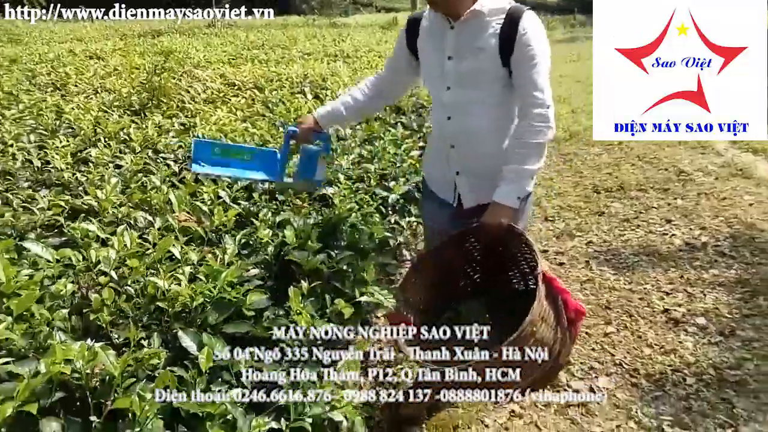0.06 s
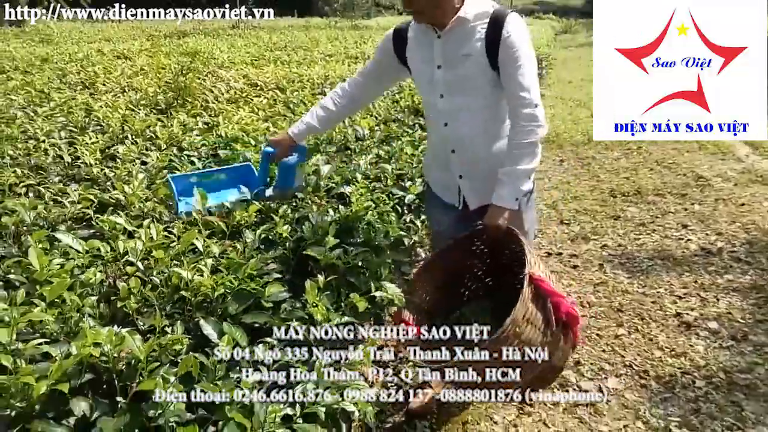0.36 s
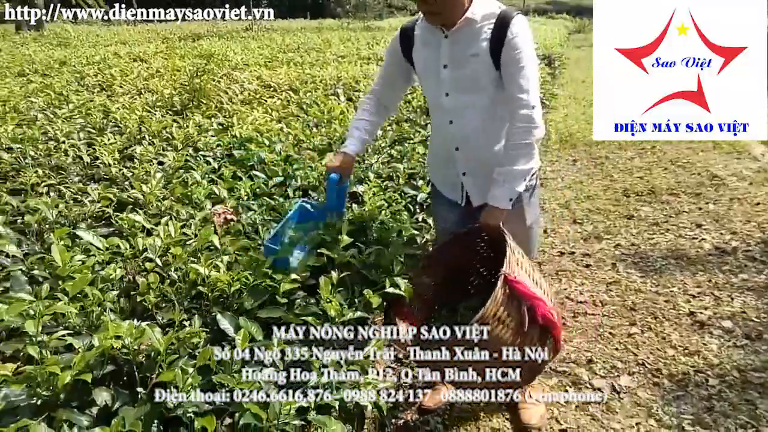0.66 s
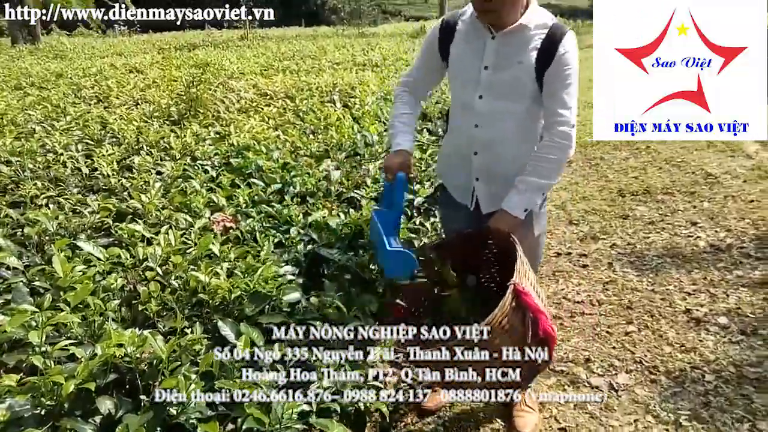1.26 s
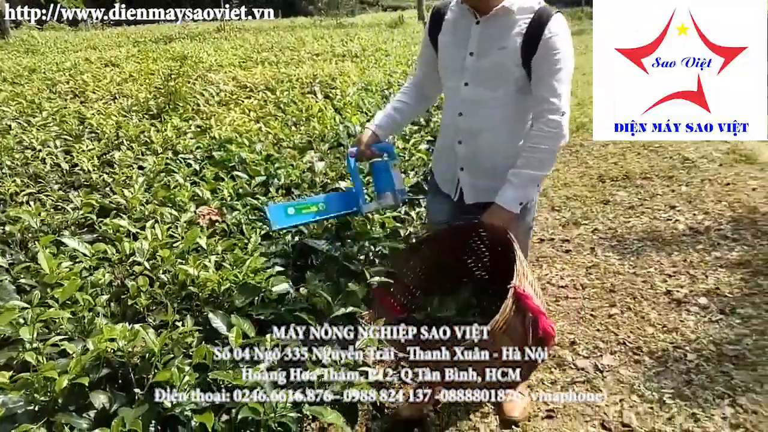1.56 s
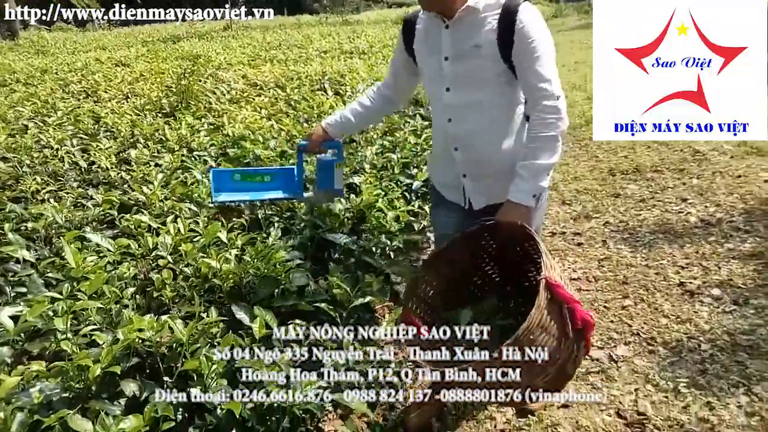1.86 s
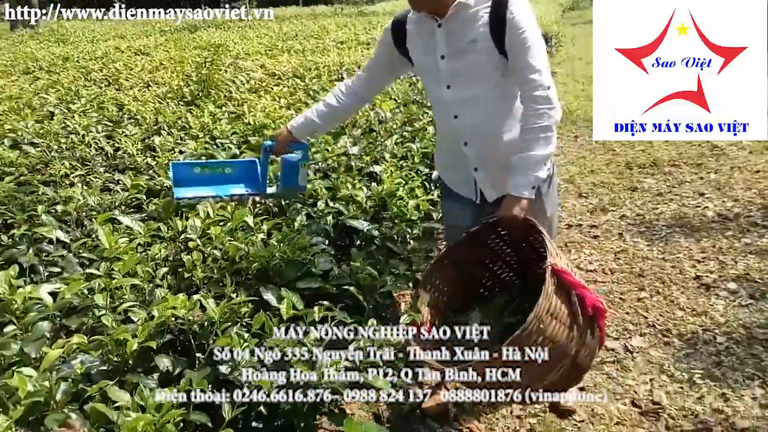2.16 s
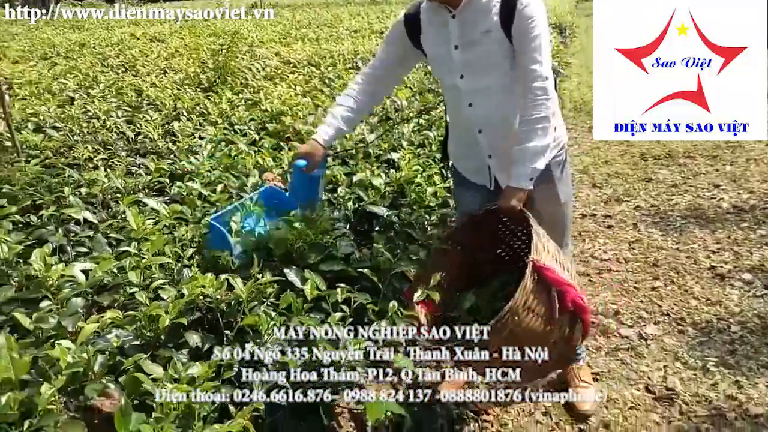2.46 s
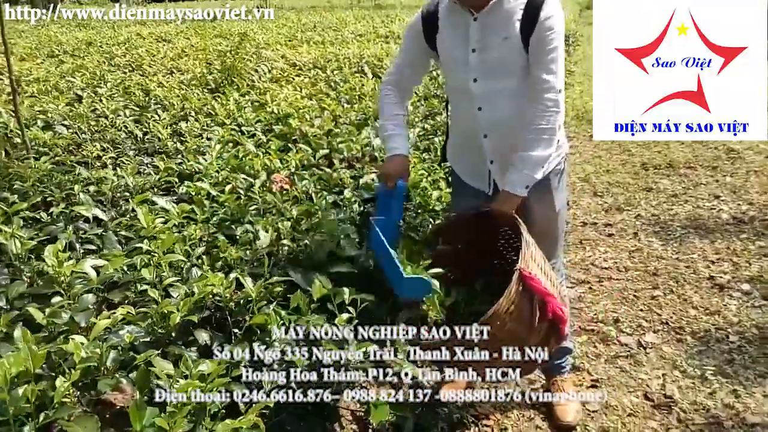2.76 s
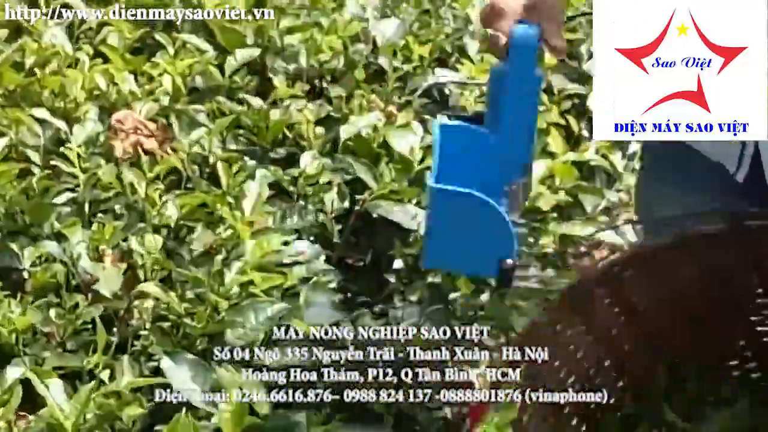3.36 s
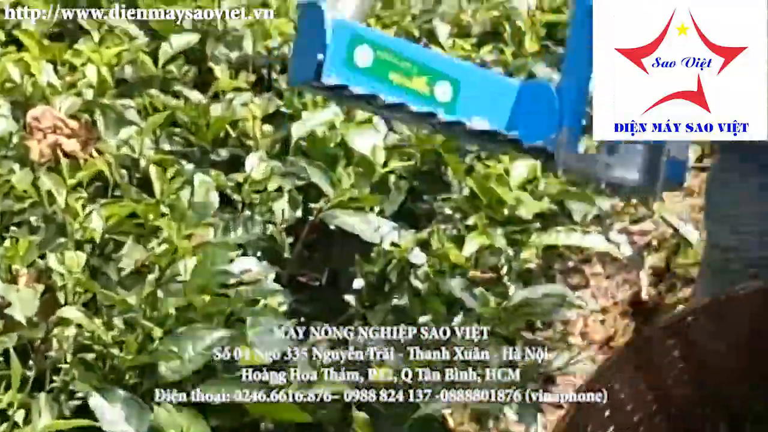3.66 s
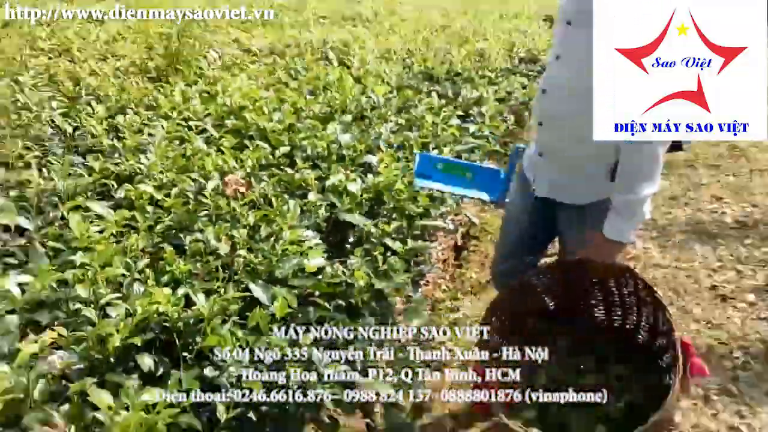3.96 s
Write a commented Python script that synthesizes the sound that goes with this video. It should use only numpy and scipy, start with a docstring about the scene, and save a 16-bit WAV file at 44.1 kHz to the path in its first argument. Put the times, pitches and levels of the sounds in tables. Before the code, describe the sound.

A battery tea cutter buzzes and rattles close by outdoors, crunching through shoots twice. It switches off and runs down with a few knocks, leaving faint rustling leaves and wind bumping the microphone.

```python
"""A battery tea cutter, close to a stereo microphone outdoors, is swept twice over a bush and tipped into
a basket. Its blades shuttle about 44 times a second: the housing hums on multiples of that rate, the
gears whine, loose blades and gears rattle in the plastic tray and shoots crunch as they are cut.
Switched off, it runs down with a few last knocks; leaves rustle and wind bumps the microphone."""
import sys
import numpy as np
from scipy import signal
from scipy.fft import rfft, irfft
from scipy.io import wavfile
from scipy.ndimage import map_coordinates

SR = 44100
rng = np.random.default_rng(int(sys.argv[2]) if len(sys.argv) > 2 else 0)


def to_wav(s):
    """Save 16-bit WAV."""
    ch = np.atleast_2d(s).T  # columns
    pcm = np.round(np.clip(ch, -1, 1) * 32767)  # PCM
    wavfile.write(sys.argv[1], SR, pcm.astype(np.int16))


N = 176400
T = np.arange(N) / SR
HZ = np.maximum(np.arange(N + 1) * SR / (2 * N), 1)
OFF_S, RUN_DOWN_S = 3.37, 0.24

# sharp resonances of the tray: (frequency [Hz], width [Hz], lift [dB])
TRAY_MODES = [(633, 138, 8.5), (831, 100, 3), (1088, 76, 6), (1378, 41, -0.5), (1620, 150, 3.5),
              (1960, 78, 3), (2140, 110, 6), (3270, 120, 4), (6600, 280, 3), (10000, 220, 4.5)]


def cutter(rattle_db=-20.5, stop_fade_s=0.09):
    """Rattle and knocks ring the tray over hum and whine; switched off, the blades coast to rest."""
    # blade speed under power: (time [s], stroke rate [Hz])
    speed = [(0.0, 44.7), (0.41, 44.5), (0.51, 44.7), (0.8, 43.6), (0.9, 42.7), (1.0, 44.1), (1.15, 44.5),
             (1.3, 43.6), (1.48, 44.4), (1.94, 44.6), (2.01, 44.3), (2.45, 44.8), (2.6, 43.4), (2.83, 44.3),
             (3.13, 44.1), (3.24, 44.3), (3.32, 44.0), (3.4, 44.7)]
    coast = np.sqrt(np.clip(1 - (T - OFF_S) / RUN_DOWN_S, 0, 1))
    strokes = 0.52 + np.cumsum(in_time(speed)[0] * coast) / SR
    moving = np.clip((OFF_S + RUN_DOWN_S - T) / stop_fade_s, 0, 1)
    contacts = np.array([rattle(strokes), rattle(strokes)])
    force = from_db(rattle_db) * moving * snap_and_tilt(contacts, strokes) + knocks()
    direct, scattered = tray(force) + np.array([bites(), bites()])
    direct = direct + bushes(direct) + reflections(direct)
    tones = hum(strokes) * coast ** 4 + whine(strokes) * coast ** 2
    return at_microphone(direct + tones, scattered + bushes(scattered))


def rattle(strokes, count=48, jitter_s=0.00014, spread_db=4):
    """The same contacts recur in every stroke, slightly early or late, amid random scraping."""
    place = (np.arange(count) + rng.random(count)) / count
    sign = rng.choice([-1, 1], count)
    chance = rng.standard_normal((200, count, 2))
    due = np.arange(len(chance))[:, None] + place
    hit_s = np.interp(due, strokes, T) + jitter_s * chance[..., 0]
    size = sign * from_db(spread_db * chance[..., 1]) * (due < strokes[-1])
    clicks = np.bincount(np.clip(hit_s * SR, 0, N - 1).astype(int).ravel(), size.ravel(), N)
    scrape = from_db(2.5) * grains(per_s=7000, spread_db=3)
    angle = 2 * np.pi * strokes
    swell = from_db(0.83 * np.cos(angle) + 0.2 * np.cos(2 * angle))
    return rms_one(swell * (rms_one(clicks) + scrape))


def snap_and_tilt(contacts, strokes, swing_db=4.5, decay_strokes=0.28, slowing_db_per_s=28):
    """The rattle snaps at each reversal and fades on slowing, most in the treble; tilting shades it."""
    # centres of the rattle's bands: (frequency [Hz])
    band_hz = [380, 720, 1200, 1900, 3500, 9000]
    # rise and fall of the bands as the tray turns: (time [s], relative level of each band [dB])
    band_levels = [(0.03, -43.5, -26.5, -23, -20.5, -16, -21), (0.22, -40.5, -22.5, -21.5, -21, -17.5, -26),
                   (0.41, -40.5, -23.5, -22, -20.5, -17, -25), (0.6, -42, -21.5, -25, -19, -17, -27.5),
                   (0.79, -51.5, -21.5, -26, -18.5, -19, -25.5), (0.98, -41, -20.5, -24, -18.5, -19, -25.5),
                   (1.17, -42, -20, -24.5, -19, -16.5, -23.5), (1.36, -41.5, -20.5, -25, -19, -17.5, -24),
                   (1.55, -41, -21.5, -26.5, -16.5, -17.5, -22.5),
                   (1.74, -40.5, -21.5, -23, -18.5, -16, -22), (1.93, -42.5, -21, -23, -21, -16, -20.5),
                   (2.12, -39.5, -26, -22, -21.5, -17, -26.5), (2.31, -45, -22.5, -24, -19, -18.5, -23.5),
                   (2.5, -40, -25, -22.5, -20.5, -20, -27.5), (2.69, -47.5, -20, -25, -16.5, -20.5, -25.5),
                   (2.88, -46, -24, -22, -19.5, -20, -24), (3.07, -40, -25.5, -24.5, -19, -20.5, -24),
                   (3.26, -35, -24, -22, -19, -17.5, -21.5), (3.38, -39.5, -28, -26, -21.5, -22, -25.5),
                   (3.47, -45, -55, -32, -23.5, -27.5, -36), (3.56, -42, -55, -28, -25, -20.5, -24)]
    strength = 1 + 0.9 * rng.uniform(-1, 1, int(strokes[-1]) + 1)
    forth, back = (np.exp(-((strokes + lead) % 1) / decay_strokes) for lead in (0, .5))
    snap_db = swing_db * strength[strokes.astype(int)] * (forth + 0.71 * back)
    slowing_db = slowing_db_per_s * np.maximum(T - OFF_S, 0)
    out = 0
    for k, level_db in enumerate(in_time(band_levels)):
        band = np.interp(np.log(HZ), np.log(band_hz), np.arange(len(band_hz)) == k)
        db = level_db + (snap_db - slowing_db) * np.sqrt(band_hz[k] / band_hz[-1])
        out = out + filtered(contacts, band) * from_db(db - db[T < OFF_S].mean())
    return out


def knocks(dull_hz=6400, ring_db=-21, ring_t60_s=0.087, ring_top_hz=2220):
    """The slowing blades strike dull blows that leave the tray ringing."""
    # last knocks: (time [s], level [dB], decay [s])
    hits = [(3.396, -17, 0.0047), (3.421, -18, 0.013), (3.4457, -18, 0.0049), (3.4766, -25, 0.011),
            (3.496, -16.5, 0.0038), (3.515, -23.5, 0.0068), (3.5405, -30.5, 0.02), (3.583, -18, 0.0085)]
    blows = filtered(bursts(hits) * rng.standard_normal((2, N)), 1 / (1 + 1j * HZ / dull_hz))
    ring = sum(np.sin(2 * np.pi * hz * T) / (1 + (hz / ring_top_hz) ** 2) for hz, _, _ in TRAY_MODES)
    ring *= from_db(-60 * T / ring_t60_s)
    return blows + from_db(ring_db) * filtered(blows, rfft(ring / np.linalg.norm(ring), 2 * N))


def tray(force):
    """The plastic tray colours every blow; some resonances stand out for a while as it turns."""
    # broad response of the tray: (frequency [Hz], relative level [dB])
    colour = [(100, -36.5), (220, -24), (330, -17), (520, -14), (590, -7.5), (740, -7), (880, -3.5),
              (970, -7), (1180, -4.5), (1400, -2), (1650, -1), (1850, -2.5), (2150, -4.5), (2450, -3),
              (2850, -10), (3200, -10), (3650, -4), (4500, -10), (5100, -18.5), (5900, -23), (6800, -20),
              (7600, -21.5), (8600, -20), (10000, -24), (11500, -26), (13300, -25), (14400, -26.5),
              (15500, -27)]
    # passing resonances: (time [s], half length [s], frequency [Hz], width [Hz], lift [dB])
    swells = [(.35, 0.48, 810, 59, 8.5), (1.155, .16, 420, 90, 6), (1.15, 0.16, 1620, 119, 2.5),
              (1.25, .3, 2980, 300, 4.5), (1.715, 0.054, 630, 110, 5.5), (1.72, 0.074, 880, 60, 5),
              (2.1, 0.39, 1414, 69.6, 5.5), (2.9, 0.11, 890, 60, 6), (3.1, 0.23, 608, 90, 8),
              (3.1, 0.77, 5860, 1400, 4), (3.296, 0.22, 1700, 120, 6)]
    modes_db = sum(lift / (1 + (2 * (HZ - hz) / width) ** 2) for hz, width, lift in TRAY_MODES)
    rung = filtered(force, causal(over_hz(colour) + modes_db))
    return rung + sum((from_db(db) - 1) * np.exp(-((T - s) / half_s) ** 2) * resonance(rung, hz, width)
                      for s, half_s, hz, width, db in swells)


def hum(strokes, gain_db=-2.5, waver_db=1.74, waver_rad=0.45):
    """The housing hums in nearly steady partials on multiples of the stroke rate."""
    # partials: (multiple of the stroke rate, relative level [dB])
    harmonics = [(6, -51.5), (7, -54), (9, -56), (11, -53), (12, -47.5), (13, -37.5), (14, -44), (15, -41),
                 (16, -49), (18, -37), (19, -34), (20, -39), (32, -41.5)]
    # the hum sinks while the blades are in the bush: (time [s], gain [dB])
    dips = [(0, 3.5), (.55, 0), (.66, 2), (.85, -8), (1.0, -2), (1.3, -6.5), (1.7, 2), (2.1, -0.5),
            (2.5, 3), (2.68, -7), (2.88, 2), (3.3, -6)]
    partials = 0
    for k, db in harmonics:
        level = from_db(db + waver_db * drift(3.2))
        partials += level * np.sin(2 * np.pi * (k * strokes + rng.random()) + waver_rad * drift(4.6))
    return np.sqrt(2) * from_db(gain_db + in_time(dips)[0]) * partials


def whine(strokes, level_db=-31.5, flare_db=5.5, flare_hz=4.1, waver_rad=0.86):
    """The gears whine in high partials that flare up at random, waver and sag with the speed."""
    # gear partials: (multiple of the stroke rate)
    multiples = (31, 32, 33, 36, 37, 38, 42, 43, 48, 49, 50)
    partials = 0
    for k in multiples:
        flare = from_db(flare_db * np.minimum(drift(flare_hz), 1))
        phase = 2 * np.pi * (k * strokes + rng.random()) + waver_rad * drift(flare_hz)
        partials += flare * np.sin(phase)
    return from_db(level_db) * rms_one(partials)


def bites(attack_s=0.033, release_s=0.12, width_hz=660):
    """Shoots are cut in a dense crunch whose pitch slides as the tray ploughs through the bush."""
    # passes over the bush: (time [s], length [s], level [dB], start pitch [Hz], end pitch [Hz])
    passes = [(0.609, .42, -29, 2200, 1811), (2.582, .45, -28.5, 1712, 2092)]
    smooth = signal.butter(2, width_hz / 2, fs=SR, output="sos")
    out = 0
    for s, length_s, db, start_hz, end_hz in passes:
        end_s = s + length_s
        envelope = np.interp(T, [s, s + attack_s, end_s, end_s + release_s], [0, 1, 1, 0])
        angle = 2 * np.pi * np.cumsum(np.interp(T, [s, end_s], [start_hz, end_hz])) / SR
        crunch = sum(signal.sosfilt(smooth, grains(per_s=1500, spread_db=4.5)) * wave(angle)
                     for wave in (np.sin, np.cos))
        out = out + from_db(db) * envelope * rms_one(crunch)
    return out


def sweep_lag_ms():
    """The sweep shifts when the sound reaches the left channel."""
    # path past the microphone: (time [s], left lag [ms])
    sweep = [(0, 0.082), (.3, 0.14), (.65, 0.14), (.95, 0.036), (1.25, -0.035), (1.6, 0.078), (2.0, 0.09),
             (2.35, 0.124), (2.6, 0.13), (3.0, -0.021), (3.6, -0.028)]
    return in_time(sweep)[0]


def at_microphone(direct, scattered):
    """The cutter is mostly louder on the left, and wider in the treble."""
    # likeness of the two channels: (frequency [Hz], correlation [0-1])
    likeness = [(200, 1), (700, 0.94), (1400, 0.82), (2200, 0.55), (4000, 0.42), (8000, 0.25),
                (15000, 0.087)]
    # balance: (frequency [Hz], left minus right [dB])
    balance = [(100, 5.5), (600, 7), (1500, 8.5), (2200, 9), (2600, 13), (3500, 6), (4600, 10.5),
               (5900, -0.5), (6900, -1), (8200, -14.5), (9500, -2), (12000, -2), (15000, 10)]
    left, right = stereo(direct, scattered, over_hz(likeness), over_hz(balance))
    return np.array([delayed(left, sweep_lag_ms()), right])


def reflections(x):
    """Ground, body and basket return near echoes that move with the sweep."""
    # echoes: (delay [ms], extra delay per left lag [ms/ms], gain [dB])
    echoes = [(1.2, 3.3, -40), (2.5, 4.43, -16.5), (4.7, 5.09, -18.5)]
    return sum(from_db(db) * delayed(x, ms + slope * sweep_lag_ms()) for ms, slope, db in echoes)


def bushes(x, gain_db=-12, t60_s=0.16, dull_hz=5000):
    """The bushes around scatter back a short, diffuse tail."""
    tail = rng.standard_normal(N) * from_db(-60 * T / t60_s)
    response = rfft(tail / np.linalg.norm(tail), 2 * N) / (1 + (HZ / dull_hz) ** 2)
    return from_db(gain_db) * filtered(x, response)


def leaves(rustle_db=-44, fade_db_per_s=14.5, tick_decay_s=0.0018, tick_width_hz=1600):
    """Disturbed leaves rustle left of centre, then settle with small ticks once the blades stop."""
    # spectrum of the rustle: (frequency [Hz], relative level [dB])
    colour = [(100, -11), (450, -19), (750, -4), (1050, -8), (1800, -1), (2800, -6), (4200, -1),
              (5200, -20.5), (8000, -21), (11000, -34), (15000, -34)]
    # leaves and twigs tick: (time [s], level before filtering [dB], pitch [Hz])
    twigs = [(3.573, -8.5, 3360), (3.6325, -20, 4140), (3.7055, -33, 2000), (3.7648, -34, 3230),
             (3.778, -25, 2210), (3.8008, -35, 4090), (3.83, -26, 2800), (3.8384, -29, 4180),
             (3.885, -22.5, 3680), (3.8907, -28, 4050), (3.9034, -34, 4100), (3.9624, -29, 4000)]
    level = from_db(rustle_db - fade_db_per_s * np.maximum(T - OFF_S - RUN_DOWN_S, 0))
    touches = np.array([grains(per_s=1600, spread_db=1) for _ in range(2)])
    rustle = filtered(level * touches, causal(over_hz(colour)))
    noise = rng.standard_normal((2, N))
    ticks = 0
    for s, db, hz in twigs:
        snap = bursts([(s, db, tick_decay_s)]) * noise
        ticks += resonance(resonance(snap, hz, tick_width_hz), hz, tick_width_hz)
    return stereo(*(rustle + ticks), likeness=0.15, pan_db=8.5)


def wind(gain_db=0.5):
    """Low, lumpy gusts and a few bumps hit the microphone, mostly on its left port."""
    # gusts: (time [s], relative level [dB])
    gusts = [(0.0, -33), (0.02, -56.5), (1.24, -58), (1.63, -53), (1.66, -41), (1.79, -51), (1.99, -49),
             (2.03, -37), (2.15, -49.5), (2.29, -40.5), (2.63, -61), (2.75, -37.5), (2.83, -58),
             (2.91, -49), (3.15, -58), (3.2, -37), (3.23, -51.5), (3.58, -39), (3.74, -42.5), (3.77, -44),
             (3.79, -43), (3.85, -36), (3.9, -42), (3.94, -30), (3.98, -36), (4.0, -53)]
    # spectrum of the gusts: (frequency [Hz], relative level [dB])
    colour = [(20, -23), (45, -16), (70, -4.5), (100, -3.5), (150, -6.5), (220, -15.5), (320, -29),
              (600, -32), (2000, -81)]
    # bumps on the microphone: (time [s], level [dB], pitch [Hz], decay [s])
    buffets = [(2.024, -24.5, 177, 0.015), (3.757, -24.5, 124, 0.013), (3.936, -21.5, 99, 0.041)]
    rumble = filtered(rng.standard_normal((2, N)), causal(over_hz(colour)))
    shared, scattered = rumble * from_db(gain_db + in_time(gusts)[0])
    bumps = sum(bursts([(s, db, decay)]) * np.sin(2 * np.pi * hz * (T - s))
                for s, db, hz, decay in buffets)
    return stereo(shared + bumps, scattered, likeness=0.49, pan_db=10.5)


def from_db(db):
    """Decibels to gain."""
    return 10 ** (np.asarray(db) / 20)


def rms_one(x):
    """Scale to rms 1."""
    return x / np.sqrt(np.mean(x ** 2) + 1e-20)


def in_time(rows):
    """Each column of a curve at every sample."""
    s, *columns = np.transpose(rows)
    return [np.interp(T, s, c) for c in columns]


def over_hz(points):
    """A spectrum table at every frequency."""
    hz, value = np.transpose(points)
    return np.interp(np.log(HZ), np.log(hz), value)


def filtered(x, response):
    """Apply a frequency response."""
    return irfft(rfft(x, 2 * N) * response)[..., :N]


def causal(db):
    """Minimum-phase response of unit power: it rings only after a blow."""
    cepstrum = irfft(np.log(rms_one(from_db(db))))
    cepstrum[1:N] *= 2
    cepstrum[N + 1:] = 0
    return np.exp(rfft(cepstrum))


def resonance(x, hz, width_hz):
    """One resonance with gain 1 at its peak."""
    return signal.lfilter(*signal.iirpeak(hz, hz / width_hz, SR), x + 1e-18)


def drift(rate_hz, hop=40):
    """Slow random wander with spread 1."""
    pole = np.exp(-2 * np.pi * hop * rate_hz / SR)
    slow = signal.lfilter([1], [1, -2 * pole, pole * pole], rng.standard_normal(N // hop + 2002))[2000:]
    return np.interp(np.arange(N) / hop, np.arange(len(slow)), rms_one(slow))


def delayed(x, ms):
    """Read a sound through a moving delay."""
    return map_coordinates(x, [np.arange(N) - ms * SR / 1000], order=3)


def grains(per_s, spread_db):
    """Random clicks of uneven size; rms 1."""
    hits = rng.random(N) < per_s / SR
    return rms_one(hits * from_db(spread_db * rng.standard_normal(N)) * rng.choice([-1, 1], N))


def bursts(rows):
    """Envelope of sudden, dying blows: (time [s], level [dB], decay [s])."""
    return sum(from_db(db) * (T >= s) * np.exp(-np.maximum(T - s, 0) / decay) for s, db, decay in rows)


def stereo(direct, scattered, likeness, pan_db):
    """Left and right from a direct mid and a scattered side signal; positive pan is left."""
    likeness, tilt = np.clip(likeness, -.99, .99), from_db(pan_db / 2)
    norm = 2 / (tilt + 1 / tilt)
    mid, side = norm * np.sqrt((1 + likeness) / 2), norm * np.sqrt((1 - likeness) / 2)
    return np.array([filtered(direct, mid * gain) + sign * filtered(scattered, side * gain)
                     for gain, sign in ((tilt, 1), (1 / tilt, -1))])


def scene():
    """The cutter up close, the leaves around it and wind on the microphone."""
    return cutter() + leaves() + wind()


def record(dry):
    """The highest peaks are rounded and the top is cut steeply."""
    ceiling, cutoff_hz = 0.98, 15500
    rounded = dry / (1 + (dry / ceiling) ** 6) ** (1 / 6)
    return filtered(rounded, 1 / (1 + (HZ / cutoff_hz) ** 400))


dry = scene()
out = record(dry)
to_wav(out)
```